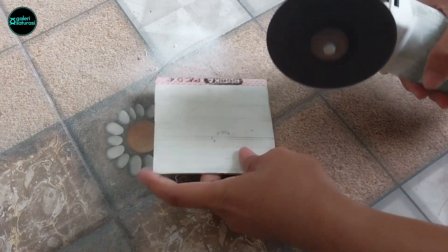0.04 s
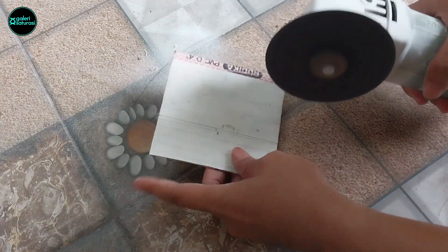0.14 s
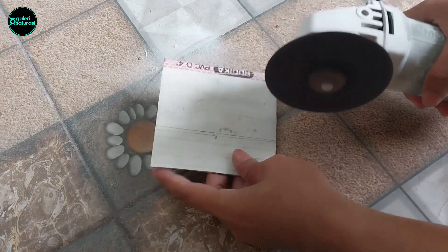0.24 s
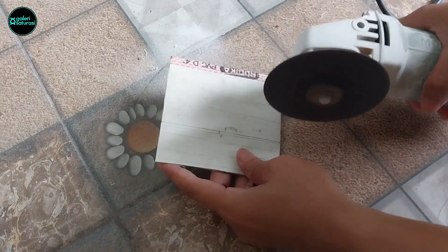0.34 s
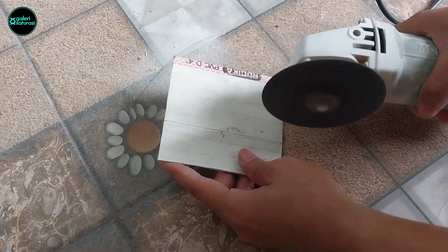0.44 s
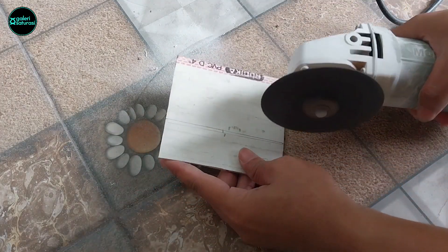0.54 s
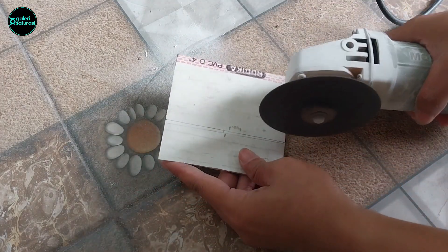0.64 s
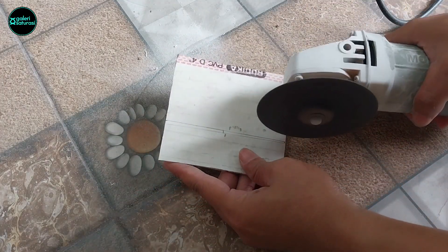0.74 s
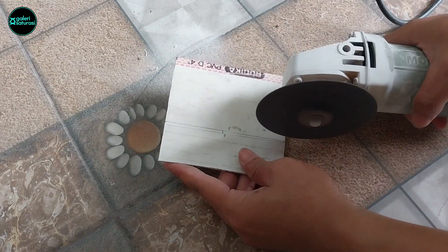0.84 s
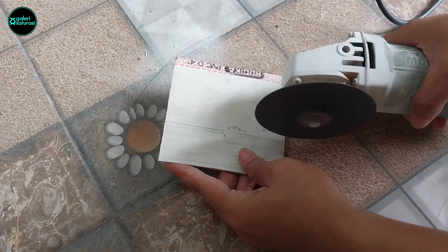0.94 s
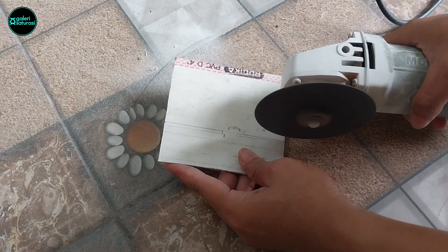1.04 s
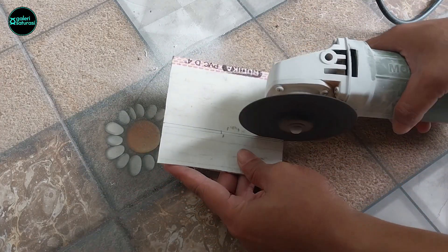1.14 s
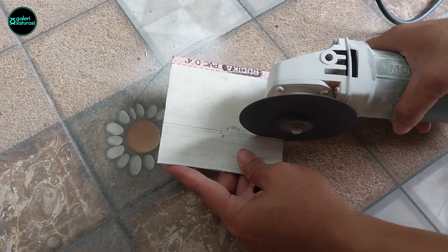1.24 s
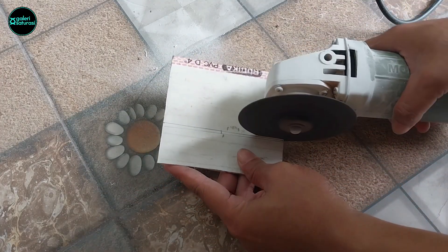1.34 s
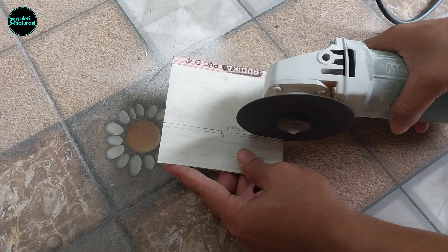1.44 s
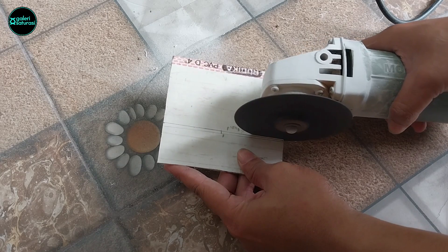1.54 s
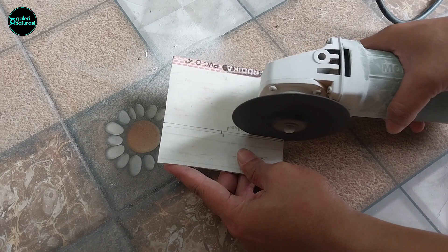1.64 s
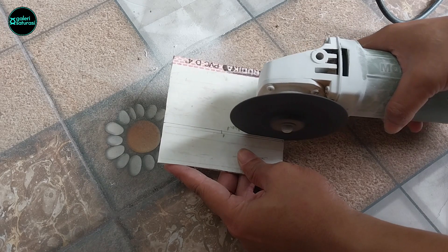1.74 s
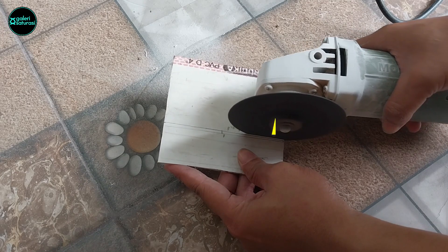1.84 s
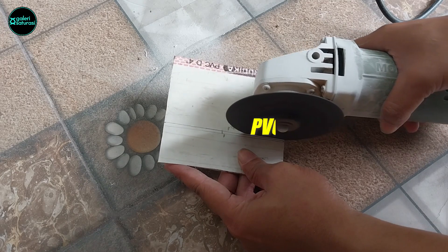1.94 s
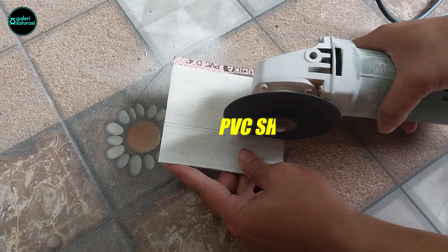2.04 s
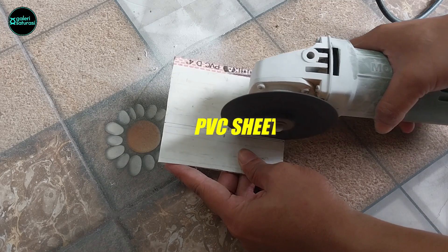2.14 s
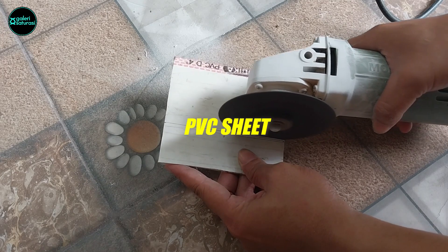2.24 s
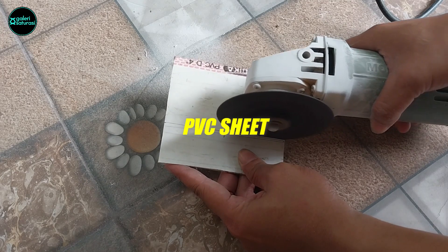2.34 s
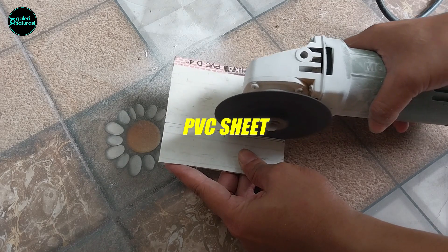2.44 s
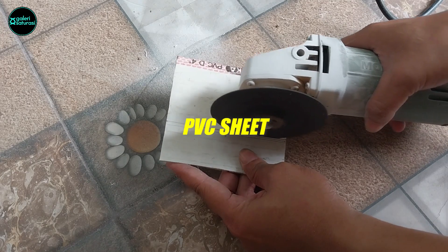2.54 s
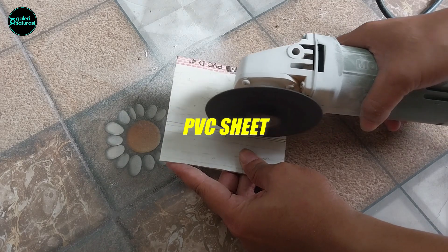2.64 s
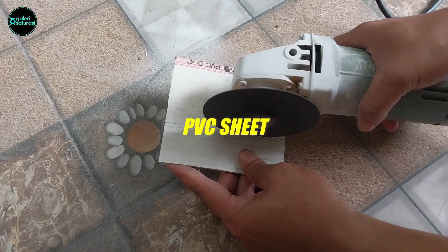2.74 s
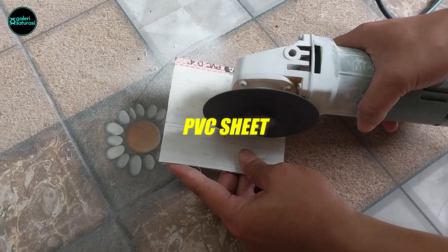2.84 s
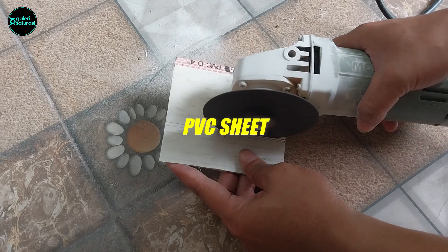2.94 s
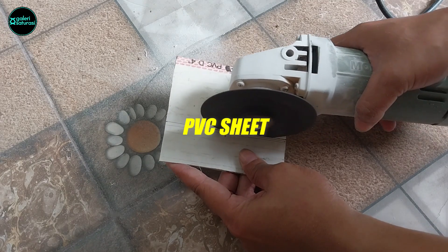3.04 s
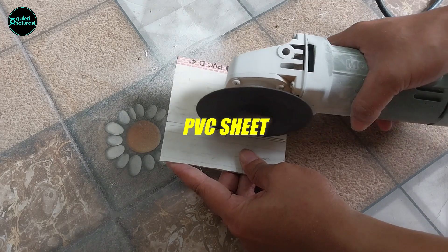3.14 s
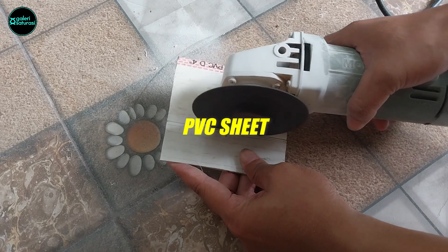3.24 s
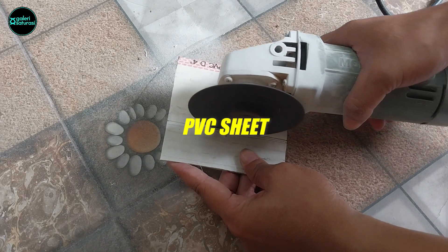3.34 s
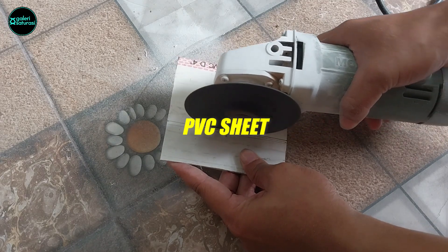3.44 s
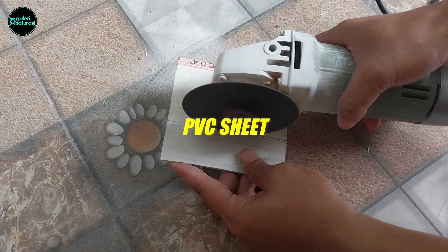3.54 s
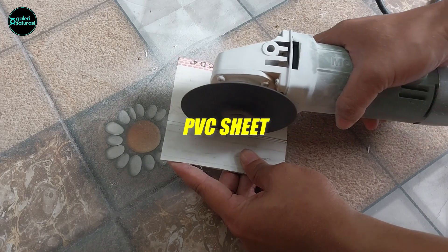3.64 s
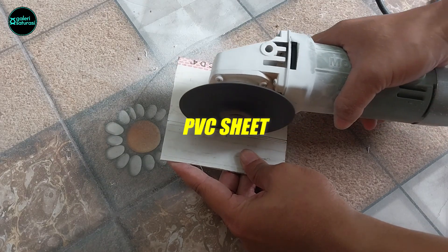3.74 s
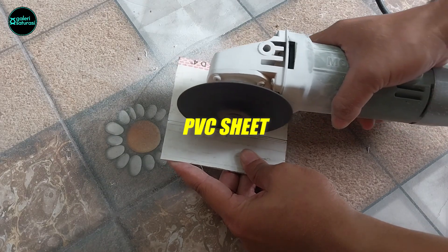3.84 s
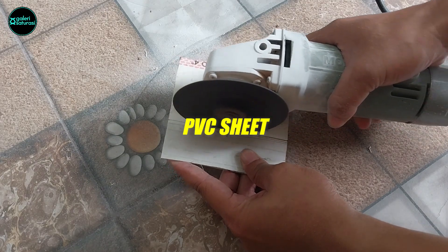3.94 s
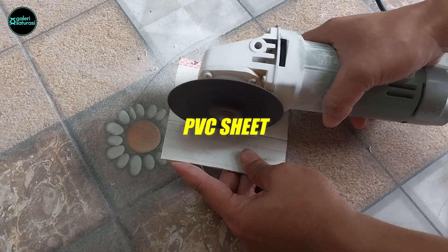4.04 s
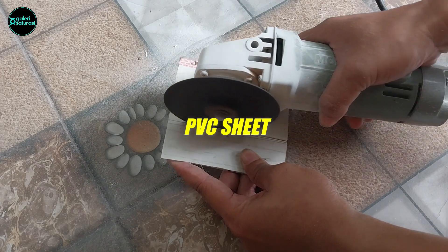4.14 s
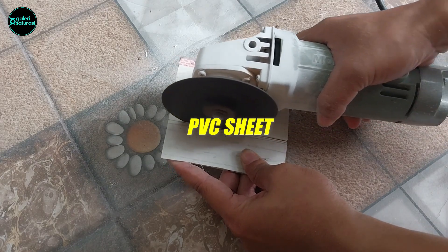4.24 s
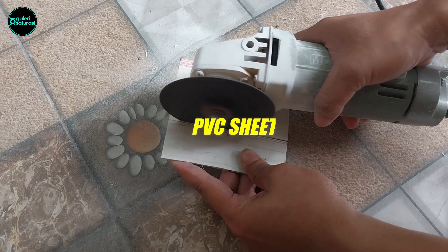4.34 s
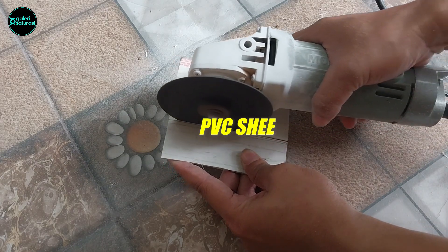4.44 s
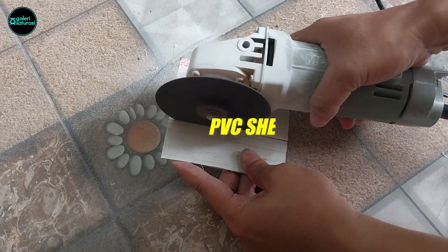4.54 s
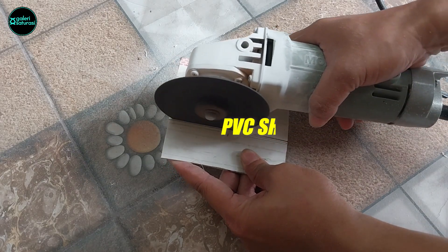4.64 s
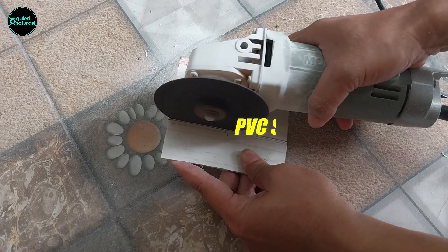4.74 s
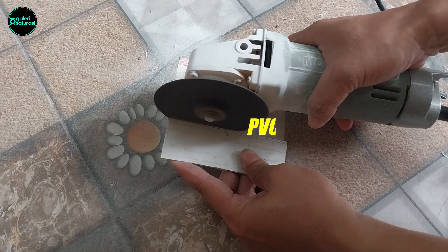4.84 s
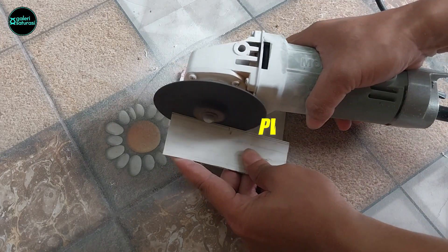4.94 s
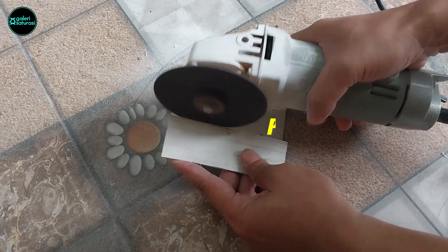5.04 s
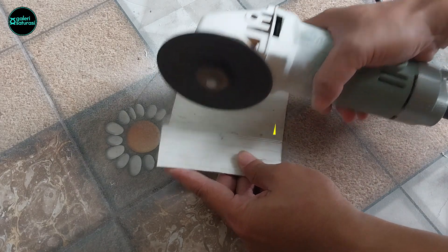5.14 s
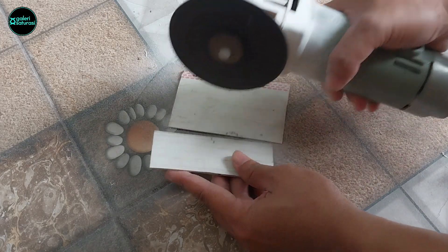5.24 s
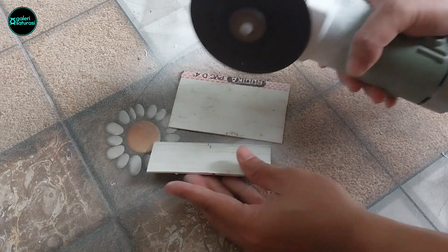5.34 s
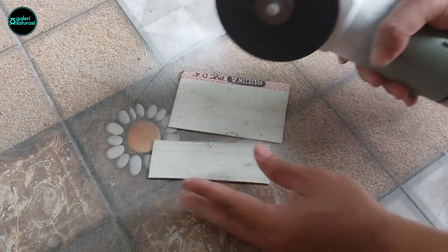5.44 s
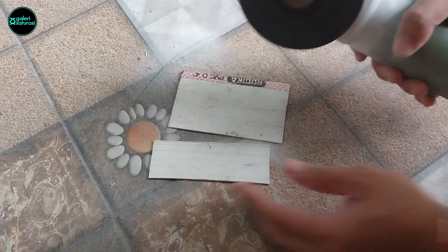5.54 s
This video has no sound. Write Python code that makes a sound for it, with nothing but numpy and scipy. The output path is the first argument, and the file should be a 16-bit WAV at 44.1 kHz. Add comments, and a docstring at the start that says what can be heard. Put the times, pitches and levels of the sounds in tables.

```python
"""An angle grinder whines up to speed close to a stereo microphone, cuts through a plastic sheet on a
tiled floor and is lifted away. The motor turns three times per disc turn; its fan hisses and its gears
rattle. In the cut the disc rubs the sheet once per turn and the sheet rings in broad resonances, while
mains torque ripple throbs the gear noise. Late in the cut the sheet thumps on the tiles."""
import sys
import numpy as np
from scipy import signal
from scipy.fft import rfft, irfft, next_fast_len
from scipy.io import wavfile
from scipy.ndimage import uniform_filter1d, map_coordinates

SR = 44100
rng = np.random.default_rng(int(sys.argv[2]) if len(sys.argv) > 2 else 0)


def materialize(psi):
    """Save the field psi as 16-bit PCM at rate SR to the path in sys.argv[1].

    A 1-D psi becomes a single channel; in a 2-D psi each row is a channel.
    """
    bounded = np.clip(np.atleast_2d(psi).T, -1, 1)
    quanta = np.round(bounded * 32767).astype(np.int16)
    wavfile.write(sys.argv[1], SR, quanta)


N = 246519
T = np.arange(N) / SR
PADDED = next_fast_len(N, True)
HZ = np.fft.rfftfreq(PADDED, 1 / SR)
TOUCH_S, CUT_END_S = 1.105, 4.9  # the disc meets the sheet; the cut ends
RIPPLE_HZ = 100  # mains torque ripple
HOP = 100  # samples between points of a slow curve

# Disc speed in the cut. Each row: time in seconds, turns per second.
CUT_SPEED = [(1.12, 166.2), (1.3, 163.9), (1.9, 159.1), (2.1, 156.6), (2.5, 150.5), (2.7, 145.5),
             (2.9, 144.8), (3.1, 143.1), (3.4, 140.8), (3.7, 140.4), (4, 139.2), (4.5, 138.1), (4.7, 139.2),
             (4.93, 143)]
# Gear noise. Each row: time in seconds, level in dB, resonance of the case in Hz.
GEAR_NOISE = [(0, -39, 5500), (0.14, -22, 5360), (0.55, -33, 5040), (1.0, -24, 4700), (1.96, -32, 4660),
              (2.26, -30.5, 5310), (2.8, -24.5, 5273), (3.35, -24, 5196), (4.0, -25, 5020),
              (4.56, -26.5, 4720), (4.87, -32.5, 4720), (4.93, -40, 4870), (5.12, -32, 4500),
              (5.28, -22, 4250), (5.59, -28, 4400)]


def cut():
    """The rim rubs the sheet, one puff of noise per turn. Returns the tones and the noise of the cut."""
    # The course of the cut. Each row: time in seconds, gains in dB for rim pressure, low rings and
    # middle rings, level of the sizzle in dB, its centre in Hz.
    course = [(1.1, 0.5, 5, -7, -32, 12600), (1.5, -0.5, 2, -1, -36, 12530),
              (1.75, 0.5, 1.5, -3, -33, 12400), (1.98, 2.5, 0.5, -3, -28, 12400),
              (2.3, 1.9, 2.5, 1.5, -32, 12400), (2.6, 0.5, 5, -2, -50, 15300),
              (2.85, 1.5, 2.2, 3.5, -37, 15500), (3.15, 2, 1, -2.5, -37, 15500),
              (3.4, 1.5, -0.5, -0.5, -32, 13300), (4.0, 1.2, -2, -1, -34, 13600),
              (4.3, 0.4, 3.5, 1, -27, 13600), (4.7, -0.8, -4, 1, -32, 13300),
              (4.9, -3.5, -13, 0, -25, 14500)]
    press_db, low_db, middle_db, sizzle_db, sizzle_hz = columns(course)
    touching = np.clip((T - TOUCH_S) / 0.006, 0, 1) * np.exp(-np.maximum(T - CUT_END_S, 0) / 0.047)
    hz, depth = columns(CUT_SPEED)[0], load()
    phase = phase_of(hz)
    tones = gain_of(press_db) * rim(hz, depth, low_db, middle_db)
    puff = 1 + 0.28 * np.cos(phase) + 0.073 * np.cos(2 * phase)
    rub = puff * gain_of(1.2 * flicker(50)) * patchy(noise(), patch_db=3.6, bins=2, frames=10)
    hiss = gain_of(press_db) * rubbing_hiss(rub, depth)
    sizzle = gain_of(sizzle_db) * evened(resonate(rub, sizzle_hz, width=1400))
    return touching * tones, touching * (hiss + sizzle + drumming(phase, depth))


def rim(hz, depth, low_db, middle_db):
    """Orders of the disc turn, each fluttering by itself as it slides through the sheet's resonances."""
    # Orders that the uneven rim favours or weakens. Each entry: order, gain in dB.
    order_db = {4: -1, 5: -10.5, 6: 2.2, 7: -7.5, 8: 0.89, 9: 3.2, 10: -1.9, 13: -1.2, 14: 3.1, 16: -1.69,
                17: 2.1, 25: 3.5, 28: 0.81, 40: 1.9, 42: 2.7, 45: 7.1, 49: 5.6, 54: 2.6}
    on, t = (T > TOUCH_S) & (T < CUT_END_S + .2), T[::HOP]
    phase, out = phase_of(hz[on]), np.zeros(N)
    hz, depth, low_db, middle_db = hz[::HOP], depth[::HOP], low_db[::HOP], middle_db[::HOP]
    for k in [*range(4, 34), *range(38, 57)]:
        band_db = np.select([k * hz < 1900, k * hz < 3000], [low_db, middle_db])
        gain = sheet(k * hz, depth) * gain_of(1.55 * drift(20, t) + order_db.get(k, 0) + band_db)
        waver = 2 * np.pi * rng.random() + 0.44 * drift(22, t)
        angle = k * phase + np.interp(T[on], t, waver)
        out[on] += np.interp(T[on], t, gain) * np.sqrt(2) * np.cos(angle)
    return out


def sheet(hz, depth):
    """Gain of the ringing sheet and disc at hz, for a load depth from 0 to 1."""
    # Their resonances. Each row: centre in Hz, width in Hz, gain in dB at light load, at full load.
    modes = [(789, 155, -36.5, -42), (1106, 230, -43.5, -37), (1290, 190, -38, -42.5),
             (1452, 168, -33, -34), (1543, 69, -42, -27.5), (1706, 120, -40, -34), (2103, 81, -32.5, -26),
             (2308, 220, -27, -31), (2302, 217, -60, -24), (2694, 300, -33, -33), (3055, 54, -31.5, -39.5),
             (4043, 430, -36, -43), (4800, 120, -41, -40), (5210, 290, -37, -33), (6720, 440, -33, -39),
             (7140, 360, -35.5, -32.5), (7650, 540, -46, -41)]
    return np.sqrt(sum((gain_of(light_db + depth * (full_db - light_db)) * peak(hz, f, width) ** 2) ** 2
                       for f, width, light_db, full_db in modes))


def rubbing_hiss(rub, depth):
    """Friction noise, heard directly and through the sheet; under load the steel disc sings with it."""
    # Friction spectrum. Each row: frequency in Hz, relative density in dB.
    colour = [(180, -49), (300, -4.5), (379, -5), (425, 0.5), (584, -15.5), (1510, 0), (1900, -1.5),
              (2280, 4), (3190, 2.5), (5080, 6), (6100, 3.5), (7570, 7), (8220, -5), (12700, -1.5),
              (16000, -1.5)]
    # Two dips in the hiss, deepening as the pitch falls.
    # Each row: centre in Hz, width in Hz, largest share taken out.
    dips = [(3500, 1000, .55), (6150, 600, .5)]
    # The ring of the disc. Each row: centre in Hz, width in Hz, level in dB at full load.
    disc_modes = [(4520, 70, -39)]
    friction = filtered(rub, gain_of(read(colour, HZ)))
    friction -= depth * filtered(friction, sum(share * peak(HZ, f, w) ** 2 for f, w, share in dips))
    ringing = (1 - depth) * filtered(rub, sheet(HZ, 0)) + depth * filtered(rub, sheet(HZ, 1))
    singing = sum(gain_of(db + 1.5 * drift(9.6)) * evened(filtered(rub, peak(HZ, f, width) ** 2))
                  for f, width, db in disc_modes)
    return gain_of(-35) * evened(ringing) + gain_of(-21.5) * evened(friction) + depth ** 2 * singing


def drumming(phase, depth):
    """The sheet drums on the floor: a rumble, with hum from the torque ripple and the disc turn."""
    rumble = evened(filtered(noise(), peak(HZ, 182, 240) ** 2 * HZ ** 2 / (HZ ** 2 + 47 ** 2)))
    ripple_hum = 0.42 * np.sin(2 * np.pi * RIPPLE_HZ * T)
    disc_hum = 0.3 * np.sin(phase) + 0.66 * depth * np.sin(2 * phase)
    level_db = -48 + 4.5 * depth ** 12 + 2 * drift(12)
    return gain_of(level_db) * (0.81 * rumble + ripple_hum + disc_hum)


def speed():
    """Disc turns per second: the whine rises, sags in the cut, drops abruptly at its end, then climbs."""
    run_up = 165.3 - 15.9 * np.exp(-T / .72)
    climb = 162.5 - 32.9 * np.exp(-np.maximum(T - CUT_END_S, 0) / .57)
    return np.select([T < TOUCH_S, T < CUT_END_S], [run_up, columns(CUT_SPEED)[0]], climb)


def load():
    """Load on the disc: 0 at first touch, 1 once the cut has slowed it by 26 turns per second."""
    return np.clip((CUT_SPEED[0][1] - columns(CUT_SPEED)[0]) / 26, 0, 1)


def gears():
    """Tooth noise rings the case, driven in bursts by torque ripple and disc turn as the load rises."""
    chirp_hz, scatter_hz = 320, 170
    level_db, case_hz = columns(GEAR_NOISE)
    phase, ripple = phase_of(columns(CUT_SPEED)[0]), 2 * np.pi * RIPPLE_HZ * T
    bite = np.minimum(2.3 * load(), 1) * (T < CUT_END_S)
    pulses = (1 + 1.15 * bite * np.cos(ripple)) ** 2 * (1 + .55 * bite * np.cos(phase))
    beat = 1 + .5 * bite * np.cos(3 * (phase - ripple))  # the rotor beats against the ripple
    throb = pulses * beat * gain_of(1.8 * flicker(60))
    throb /= np.sqrt(uniform_filter1d(throb ** 2, size=5000))
    narrow = evened(resonate(throb * noise(), case_hz, width=990))
    wide = evened(filtered(throb * noise(), peak(HZ, 5200, 4500) ** 2))
    # under load each burst rings as a tone, its pitch rising within the burst and scattering a little
    ring_hz = case_hz + chirp_hz * np.sin(ripple) + scatter_hz * flicker(150)
    ring = bite * throb * np.cos(phase_of(ring_hz))
    return gain_of(level_db) * evened(.5 * narrow + 0.11 * wide + 1.5 * ring)


def gear_head():
    """The gear head whines, throbbing with the torque ripple under load; louder on the right."""
    # What the head sings. Each row: order of the disc turn, gain in dB running free, in the cut.
    orders = [(34, -40, -3), (35, -40, 0), (36, 0, -4), (37, -40, -6)]
    # Its resonances. Each row: centre in Hz, width in Hz, gain in dB running free, in the cut.
    modes = [(4930, 130, -50, -31), (5300, 280, -44, -31), (5650, 380, -34.5, -50), (5920, 220, -44, -26)]
    away_db, flutter_db, right_lead_rad = -10, 3, 2.1
    hz, out, t = speed(), np.zeros((2, N)), T[::HOP]
    phase = phase_of(hz)
    cutting, away = staged((0, 1, 0))[::HOP], staged((0, 0, 1))[::HOP]
    for k, free_db, cut_db in orders:
        gain = sum(gain_of(free + cutting * (loaded - free)) * peak(k * hz[::HOP], f, width) ** 2
                   for f, width, free, loaded in modes)
        level_db = free_db + cutting * (cut_db - free_db) + away * away_db
        gain *= gain_of(level_db + flutter_db * drift(25, t))
        angle = k * phase + np.interp(T, t, 2 * np.pi * rng.random() + 0.44 * drift(25, t))
        out += np.interp(T, t, gain) * np.array([np.cos(angle), np.cos(angle + right_lead_rad)])
    throb = 1 + .6 * load() * (T < CUT_END_S) * np.cos(2 * np.pi * RIPPLE_HZ * T)
    return np.sqrt(2) * throb * out * gain_of([[-2], [2]])


def motor():
    """Three wavering rotor orders, each loudest where it crosses a resonance of the case."""
    # One resonance per order. Each row: centre in Hz, width in Hz, level in dB, then changes in dB
    # for the cut, for heavy load on top of that, and for the tool lifted away.
    modes = [(440, 400, -38.5, -6, 4.5, -7), (1350, 900, -30.5, -25, 0, -5), (1790, 140, -33, -18, 0, -3)]
    disc_orders, flutters_db = (3, 9, 12), (2.5, .8, .8)
    hz, out = speed(), np.zeros(N)
    heavy = np.clip((load() - .6) / .2, 0, 1) * staged((0, 1, 0))
    for k, flutter_db, (f, width, db, cut_db, heavy_db, away_db) in zip(disc_orders, flutters_db, modes):
        level_db = db + staged((0, cut_db, away_db)) + heavy_db * heavy + flutter_db * drift(30)
        tone = np.sqrt(2) * np.sin(k * phase_of(hz) + 0.43 * drift(22))
        out += gain_of(level_db) * peak(k * hz, f, width) ** 2 * tone
    return out


def fan():
    """Cooling air hisses from the fan, softer but brighter during the cut."""
    # Spectrum of the air. Each row: frequency in Hz, relative density in dB.
    colour = [(15, -75), (25, -50), (229, -12), (405, -15.5), (476, -8), (677, -8), (936, -3.5),
              (1160, -8.5), (1400, -5.5), (2220, -7.5), (3200, -7), (4740, -5.5), (7110, -9), (8360, -16.5),
              (13600, -9), (16000, -20.5)]
    level_db, treble_db = staged((-21, -26.5, -27)), staged((0.3, 7, 2))
    air = patchy(noise(read(colour, HZ)), patch_db=2.14, bins=8, frames=6)
    treble = filtered(air, HZ ** 2 / (HZ ** 2 + 6500 ** 2))
    return gain_of(level_db + 1.15 * flicker(45)) * (air - treble + gain_of(treble_db) * treble)


def gear_knocks():
    """Unloaded gear teeth knock: short noise bursts ring the case in two resonances."""
    # Each row: start in seconds, relative peak level in dB.
    knocks = [(0.113, -11), (0.1315, -11), (0.2527, -13), (0.3136, -11), (0.4069, -10), (0.5051, -16),
              (0.6463, -14), (0.78, -13), (4.9206, -14), (4.9436, -12), (4.9598, -15), (4.977, -11),
              (5.0119, -13), (5.0368, -15), (5.0693, -16), (5.0982, -17), (5.1247, -14), (5.1471, -16),
              (5.1775, -18), (5.2369, -15), (5.2988, -17), (5.3202, -14), (5.3871, -14), (5.416, -17),
              (5.4429, -16), (5.5178, -17)]
    rise_s, decay_s, upper_hz = .0006, .0025, 6950
    out, t = np.zeros((2, N)), np.arange(900) / SR
    gear_s, _, case_hz = np.transpose(GEAR_NOISE)
    for s, db in knocks:
        bursts = rng.standard_normal((3, len(t))) * np.minimum(t / rise_s, 1) * np.exp(-t / decay_s)
        burst = bursts[0] + .3 * bursts[1:]  # mostly alike on both sides
        lower = signal.lfilter(*signal.iirpeak(np.interp(s, gear_s, case_hz), Q=6, fs=SR), burst)
        upper = signal.lfilter(*signal.iirpeak(upper_hz, Q=7, fs=SR), burst)
        ring = lower + gain_of(-4) * upper
        add(out, s, gain_of(db + 2.5) * ring / abs(ring).max())
    return out


def sheet_thumps():
    """The sheet thumps on the tiles: three low partials that die quickly."""
    # Each row: start in seconds, level in dB.
    thumps = [(4.205, -21), (4.234, -27), (4.36, -25), (4.416, -24), (4.456, -23), (4.806, -30),
              (4.928, -32), (4.969, -31)]
    out, t = np.zeros((2, N)), np.arange(4000) / SR
    partials = sum(gain * np.sin(2 * np.pi * hz * t) for hz, gain in ((140, 1), (270, 1), (410, 0.79)))
    thump = partials * np.minimum(t / 0.005, 1) * np.exp(-t / 0.015)
    for s, db in thumps:
        add(out, s, gain_of(db) * np.array([thump, thump]) / 2)
    return out


def room(x):
    """Sparse reflections off tiles and walls, a different set on each side."""
    t, reverb_s = np.arange(9000) / SR, 0.26
    taps = rng.choice([-1., 1.], (2, len(t))) * (rng.random((2, len(t))) < .05)
    taps *= gain_of(-60 * t / reverb_s) * (t > .003)
    return signal.fftconvolve(x[None], taps / np.linalg.norm(taps[0]), axes=1)[:, :N]


def staged(values):
    """One value each for the run-up, the cut and the lift, with quick changes between."""
    times = [TOUCH_S - .01, TOUCH_S + .03, CUT_END_S, CUT_END_S + .08]
    return np.interp(T, times, np.take(values, [0, 1, 1, 2]))


def noise(colour_db=0):
    """Stereo noise, partly alike at the two sides of the microphone."""
    # Each row: frequency in Hz, left-right correlation.
    likeness = [(60, 0.11), (250, 0.74), (1000, 0.63), (2500, 0.039), (5000, 0.048), (9000, 0.052),
                (14000, 0.069)]
    left, other = rng.standard_normal((2, N))
    same = np.clip(read(likeness, HZ), 0, 1)
    right = filtered(left, same) + filtered(other, np.sqrt(1 - same ** 2))
    return evened(filtered(np.array([left, right]), gain_of(colour_db)))


def patchy(x, patch_db, bins, frames):
    """Makes x louder and softer in random patches of time and frequency."""
    _, _, spectra = signal.stft(x, SR, nperseg=1024)
    patches = uniform_filter1d(rng.standard_normal(spectra.shape[1:]), size=bins, axis=0)
    patches = evened(uniform_filter1d(patches, size=frames, axis=1))
    return evened(signal.istft(spectra * gain_of(patch_db * patches), SR, nperseg=1024)[1][:, :N])


def drift(per_s, t=T):
    """Smooth random wander of rms 1."""
    steps = rng.standard_normal(int(N / SR * per_s * 4) + 8)
    return evened(np.interp(t * per_s * 4, np.arange(len(steps)), uniform_filter1d(steps, size=4)))


def flicker(per_s):
    """Quick random wander with no slow swell."""
    quick = drift(per_s)
    return evened(quick - uniform_filter1d(quick, size=1800))


def resonate(x, hz, width):
    """Two passes of a resonance, width in Hz, that follows the curve hz."""
    turn, r = np.exp(1j * phase_of(hz)), np.exp(-np.pi * width / SR)
    return 2 * (turn * signal.lfilter([(1 - r) ** 2], [1, -2 * r, r * r], x / turn)).real


def peak(hz, centre_hz, width):
    """Gain of a resonance at hz."""
    return 1 / np.sqrt(1 + (2 * (hz - centre_hz) / width) ** 2)


def filtered(x, gain):
    """Applies a gain given at the frequencies HZ."""
    return irfft(rfft(x, PADDED) * gain, PADDED)[..., :N]


def phase_of(hz):
    """Running phase of a frequency curve, in radians."""
    return 2 * np.pi * np.cumsum(hz) / SR


def gain_of(db):
    """dB to gain."""
    return 10 ** (np.asarray(db) / 20)


def evened(x):
    """Scales to rms 1."""
    return x / np.sqrt(np.mean(x ** 2) + 1e-20)


def read(points, hz):
    """Reads a spectrum on a log frequency axis."""
    f, value = np.transpose(points)
    return np.interp(np.log(hz + 1), np.log(f + 1), value)


def columns(rows):
    """Each column after the time column, sample by sample."""
    s, *rest = np.transpose(rows)
    return [np.interp(T, s, c) for c in rest]


def add(mix, s, sound):
    """Mixes a sound in at s seconds."""
    at = round(s * SR)
    mix[:, at:at + sound.shape[1]] += sound[:, :N - at]


def scene():
    """The grinder at close range: motor and rim tones arrive directly and off the room, the rest dry."""
    whine, air = motor(), fan()
    tones, hiss = cut()
    tonal = whine + tones
    in_room = gain_of(-2.5) * tonal + gain_of(-10) * room(tonal)
    return in_room + air + hiss + gears() + gear_head() + gear_knocks() + sheet_thumps()


def record(dry):
    """A spaced pair close to the tool: delay, phase and balance, soft overload, then the band limit."""
    # The tool travels across the pair. Each row: time in seconds, lag of the left side in samples.
    travel = [(.2, 5), (1.4, .5), (4.4, -5), (5, 1.5)]
    # Balance of the pair. Each row: frequency in Hz, left minus right in dB.
    balance = [(60, 16.5), (150, 5.5), (380, -2.5), (950, -1.5), (2380, 0), (5980, -2), (15000, -1.5)]
    # Phase across the pair. Each row: frequency in Hz, lead of the left side in radians.
    lead = [(60, 1.6), (300, 0.59), (1000, 0.69), (3000, 0), (6000, 0), (15000, 0)]
    ceiling, edge_hz = .95, 15800
    left = map_coordinates(dry[0], [np.arange(N) - columns(travel)[0]], order=3, mode="nearest")
    half = gain_of(read(balance, HZ) / 2) * np.exp(.5j * read(lead, HZ))
    pair = filtered(np.array([left, dry[1]]), np.array([half, 1 / half]))
    pair = pair / (1 + (pair / ceiling) ** 4) ** (1 / 4)  # the highest peaks are rounded off
    lowpass = signal.firwin(801, edge_hz, window=("kaiser", 10), fs=SR)
    return signal.oaconvolve(pair, lowpass[None], "same")


dry = scene()
out = record(dry)
materialize(out)
```